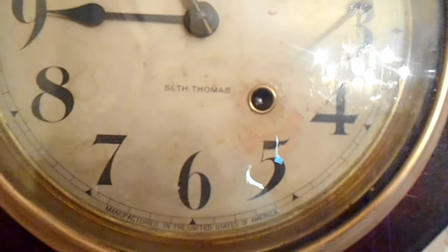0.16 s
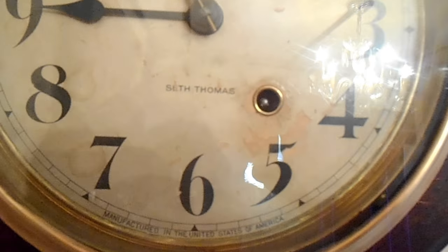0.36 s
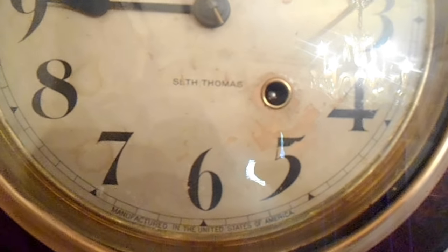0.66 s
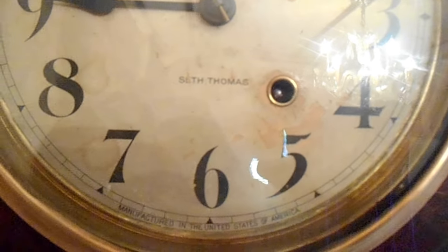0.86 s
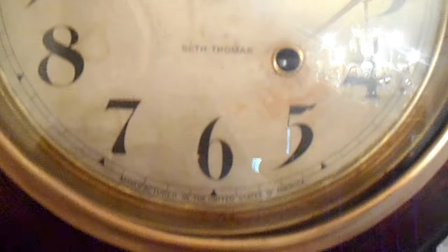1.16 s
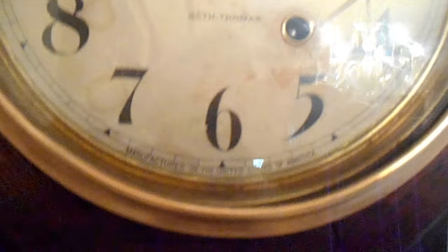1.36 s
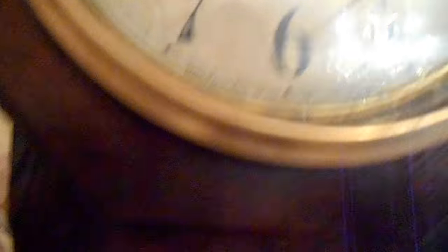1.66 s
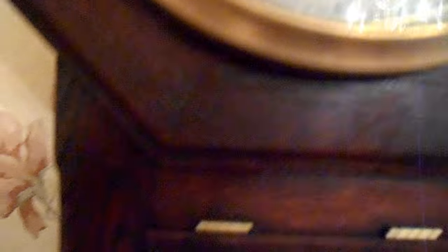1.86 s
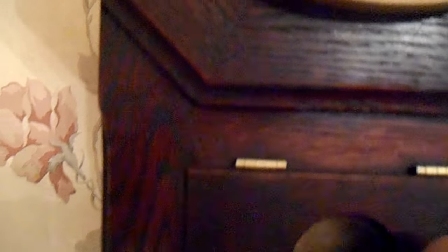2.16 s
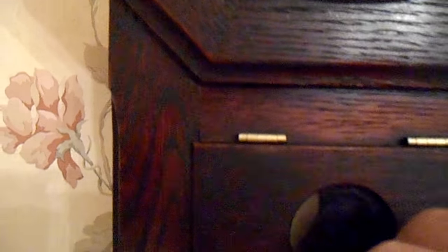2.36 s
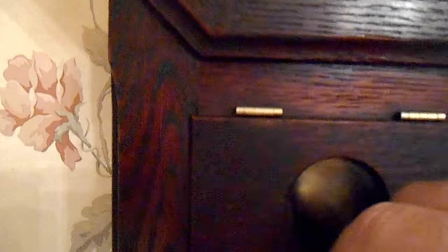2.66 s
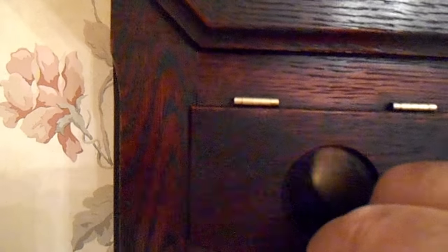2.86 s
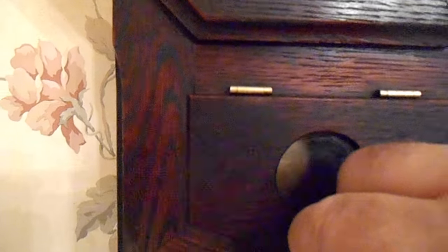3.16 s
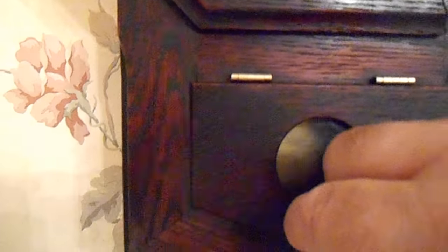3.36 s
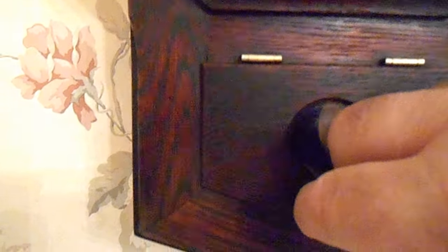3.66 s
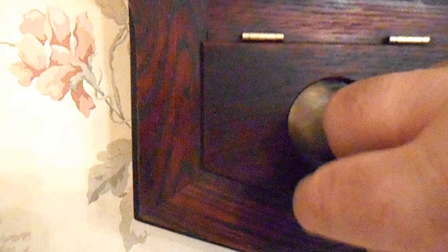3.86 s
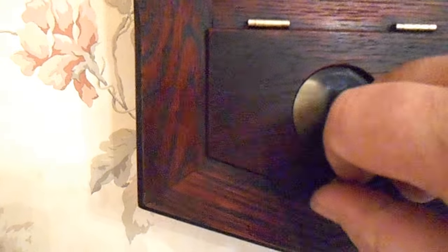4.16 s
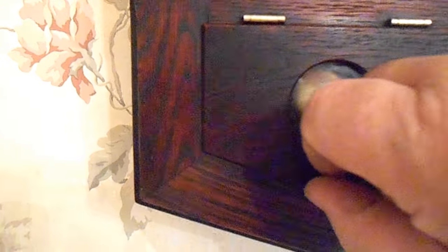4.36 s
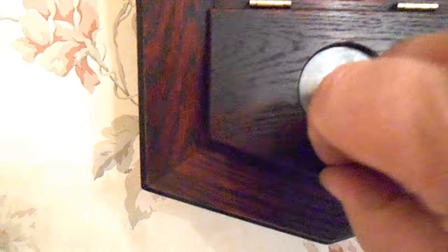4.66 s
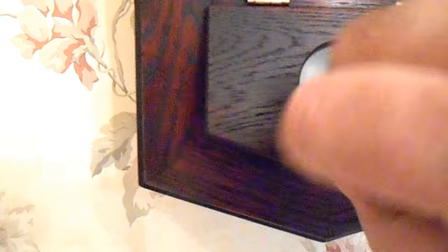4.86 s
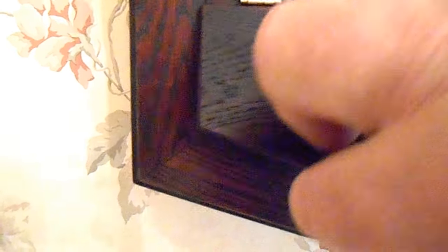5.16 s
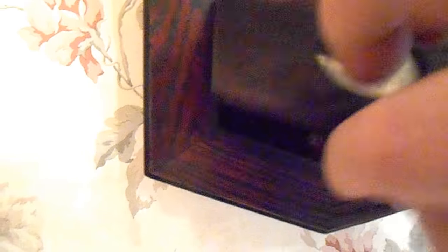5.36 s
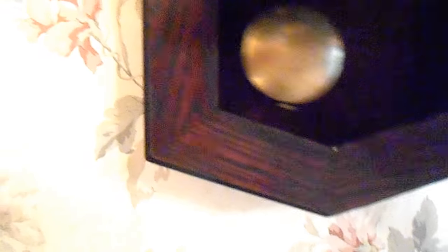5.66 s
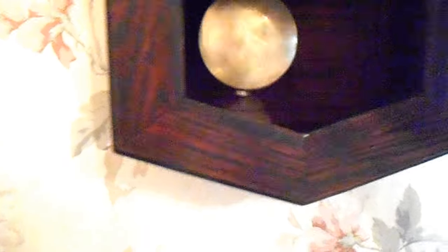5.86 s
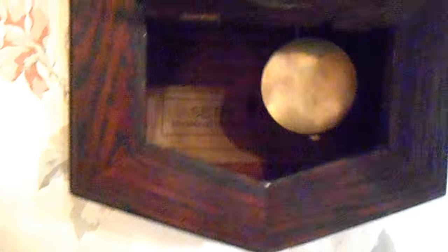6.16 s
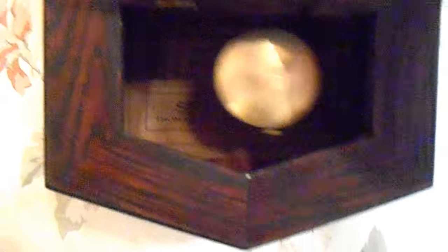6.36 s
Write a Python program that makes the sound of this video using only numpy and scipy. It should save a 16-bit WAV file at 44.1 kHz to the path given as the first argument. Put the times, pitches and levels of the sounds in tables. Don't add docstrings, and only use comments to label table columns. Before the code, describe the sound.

A wooden pendulum clock ticks steadily in a quiet room while a hand rubs, clatters, snaps and knocks, then opens a faintly squeaking little door.

```python
import sys
import numpy as np
from scipy import signal
from scipy.fft import rfft, irfft
from scipy.io import wavfile

SR = 44100
rng = np.random.default_rng(int(sys.argv[2]) if len(sys.argv) > 2 else 0)


def transcribe(u):
    v = np.clip(np.atleast_2d(u).T, -1, 1)
    q = np.round(v * 32767).astype(np.int16)
    wavfile.write(sys.argv[1], SR, q)


def natural_amplitude(level_db):
    exponent = np.asarray(level_db, float) / 20
    return 10 ** exponent


N = 287532

# start in seconds, peak in dB.
TICKS = [(0.118, -27.5), (0.973, -27), (1.828, -26), (2.684, -25.5), (3.537, -28), (4.394, -28),
         (5.247, -26.5), (6.099, -26.5)]
# start in seconds, peak in dB.
TOCKS = [(0.535, -29), (1.391, -26), (2.246, -30.5), (3.099, -27), (3.955, -28.5), (4.809, -27.5),
         (5.666, -30)]
# pitch in Hz, tick level in dB, tock level in dB, T60 in seconds.
CLOCK_MODES = [(579.7, -18, -5, 0.16), (707, -4, -3.5, 0.057), (885, -35, -9, 0.1), (1055, -2, -1.5, 0.055),
               (1187, -43, -12, 0.24), (1460, -9, -8, 0.12), (1520, 0, 2, 0.021), (1675, 1.5, -43, 0.023),
               (1950, -29, -19, 0.0081), (2000, -18.5, -34, 0.023), (2156, -1.5, -30, 0.024),
               (2389, -6.5, 3, 0.03), (2530, 5.5, -17, 0.02), (2637, -11, 2.5, 0.022),
               (2947, -15, 4.5, 0.015), (3210, -23.5, -20.5, 0.082), (3430, -13, -1.5, 0.011)]
# start in seconds, middle peak in dB, bass in dB, treble in dB,
# hardness in dB per octave.
KNOCKS = [(0.388, -41, -39.5, -60, -13), (2.036, -19, -22.5, -19, -5.5), (2.080, -11, -36, -17.5, 7),
          (2.17, -58, -47.5, -68, 1), (2.329, -35.5, -43.5, -38, -8), (2.72, -58, -61, -70, -8),
          (2.764, -37, -52, -54, 8), (3.48, -39.5, -54.5, -50, 6.5), (3.742, -47, -42.5, -69, -6.5),
          (3.9, -52, -58, -70, -1.5), (3.943, -34.5, -40.5, -33, 6.5), (4.167, -23, -27.5, -21.5, -2.5),
          (5.476, -29.5, -46, -39, 12), (5.842, -22.5, -45, -23.5, 3.5), (5.945, -32.5, -37, -49, -4.5)]
# pitch in Hz, level in dB, T60 in seconds.
PANEL_MODES = [(153.3, -22, 0.032), (212.4, -0.5, 0.074), (297, -4.5, 0.068), (377, -4.5, 0.14),
               (480, 6, 0.028), (564, -0.5, 0.104), (668, -2.5, 0.12)]
# pitch in Hz, level in dB, T60 in seconds.
FRAME_MODES = [(737, 3, 0.23), (922, 6, 0.19), (1048, 0, 0.54), (1110, -13, 0.045), (1450, -10, 0.053),
               (1610, -22, 0.15), (1833, 6, 0.098), (1980, 10, 0.038), (2370, -9, 0.037),
               (2450, -14, 0.075), (2733, 9, 0.11), (2960, -13, 0.091), (3360, -1, 0.11)]
# start in seconds, peak in dB, ring pitch in Hz,
# ring level over the crack in dB.
SNAPS = [(1.4258, -34.5, 5570, 7), (1.4915, -30, 10000, -8), (1.6512, -31.5, 4660, -0.5),
         (1.6625, -36, 8150, 0), (1.8523, -21, 4760, -2.5), (1.8926, -35, 3430, -5), (2.076, -28, 3940, 10),
         (2.125, -26.5, 8430, -10), (2.183, -40.5, 8700, -4), (2.588, -12, 6200, 4), (2.5892, -17, 3860, 7),
         (2.89, -46, 4130, 1), (3.11, -47, 3350, -16), (3.444, -43, 3570, -6), (3.7045, -47, 3650, -6),
         (3.9394, -38, 3400, 15), (4.1682, -14, 7700, 2), (4.2723, -44.5, 4400, 5), (5.4133, -43, 3670, -2),
         (5.4743, -20, 3460, -17)]
# start in seconds, middle peak in dB, treble in dB.
CLATTER = [
    (0.019, -16.5, -24.5),
    (0.146, -19.5, -31),
    (0.267, -26.5, -33),
    (0.289, -25.5, -22.5),
    (0.321, -21, -22.5),
    (0.373, -22, -26),
    (0.58, -18.5, -18),
    (0.647, -40, -31),
    (0.693, -28, -22),
]
# pitch in Hz, level in dB, T60 in seconds.
JINGLE = [
    (10487, 4, .6),
    (11620, 9, .55),
    (7500, 2.5, .2),
]
# start in seconds, level in dB.
JINGLE_HITS = [
    (0.584, -48.5),
    (0.693, -60),
]
# time in seconds, level in dB.
RUB = [
    (0.0, -45),
    (0.114, -50),
    (0.25, -48),
    (0.386, -44),
    (0.568, -46.5),
    (0.644, -35.5),
    (0.78, -46),
    (0.92, -71),
]
# frequency in Hz, level in dB per Hz.
RUB_MIDDLE = [(180, -53), (300, -16.5), (585, -10.5), (851, -8.5), (1120, -9), (1920, -7), (4500, -8.5),
              (5850, -62), (9900, -120)]
# frequency in Hz, level in dB per Hz.
RUB_TREBLE = [(3000, -47), (4000, -17), (5500, -18), (6500, -8.5), (7500, -2), (8400, -2), (9500, -12.5),
              (12500, -21), (14000, -40)]
# start in seconds, length in seconds, lowest frequency in Hz,
# first level in dB, last level in dB.
STROKES = [(1.323, 0.15, 4300, -53.5, -55.5), (1.433, 0.057, 4550, -42.5, -38.5),
           (1.53, 0.0098, 7000, -59, -55), (1.656, .057, 6500, -59, -65), (1.867, 0.073, 4840, -55, -59),
           (2.116, 0.13, 3950, -53, -55), (2.32, 0.025, 2900, -43, -57), (2.584, 0.18, 4500, -59, -61),
           (2.758, 0.018, 1500, -49, -53), (2.804, 0.055, 500, -57, -59), (2.884, 0.041, 2000, -44.5, -64),
           (3.473, 0.02, 2000, -50.5, -57), (3.884, 0.058, 497, -62, -45.5), (3.999, 0.053, 1000, -57, -64),
           (5.309, 0.053, 5930, -56, -53), (5.367, .04, 5560, -61, -54), (5.468, 0.14, 2700, -43, -60),
           (5.596, 0.07, 3900, -52.5, -49.5), (5.665, 0.14, 3430, -58, -51), (5.803, 0.058, 4760, -46, -36),
           (5.851, 0.042, 6800, -46, -40.5), (5.895, 0.054, 3430, -54, -43.5)]
# start in seconds, length in seconds, pitch in Hz, width in Hz, level in dB.
SQUEAKS = [
    (2.85, .25, 6550, 50, -67.5),
    (2.93, .13, 1260, 50, -62.5),
    (5.843, .127, 5650, 45, -50),
    (5.84, .018, 5650, 150, -37),
    (5.835, .085, 720, 70, -49),
    (5.91, .045, 4150, 120, -58),
    (5.86, .07, 1450, 60, -55.5),
    (5.5, .11, 5800, 250, -57),
    (1.44, .025, 3750, 200, -43.5),
]
# start in seconds, length in seconds, level in dB.
GROANS = [
    (2.718, 0.19, -66.5),
    (3.905, 0.14, -61.5),
    (4.621, 0.13, -63),
    (4.795, 0.33, -70.5),
    (5.279, .1, -66.5),
    (5.467, .25, -58.5),
    (6.065, .09, -63),
]
# peak time in seconds, level in dB, settling in dB per second.
SWAY = [
    (0.352, -24, 132),
    (0.623, -28, 65),
]
MOTOR_DB = [-70, -63.5, -73.5]
# frequency in Hz, level in dB per Hz.
HISS_COLOUR = [(25, -9), (65, -11), (90, -16), (207, -16.5), (400, -16), (576, -15.5), (1190, -15),
               (2600, -17.5), (3600, -19.5), (5000, -24.5), (8300, -23.5), (10400, -29), (11000, -37.5),
               (13000, -25.5)]

TICK_BRASS_DB, TOCK_BRASS_DB, OPEN_BRASS_DB, DOOR_OPEN_S = -12, -20.5, 8.5, 5.5
RING_STRETCH, HARD_SHORTENS = 1.03, 0.047
SNAP_T60_S, CLATTER_T60_S = 0.0057, 0.31
SLIDE_DB, SLIDE_END_S, SLIDE_FADE_DB_PER_S = -34.5, 0.33, 69
STROKE_TOP_HZ = 9800
GROAN_HZ, GROAN_WIDTH_HZ = 217, 24
SWAY_RISE_DB_PER_S, SWAY_REST_DB = 330, -67
MOTOR_HZ, IN_STEP_S = [57.05, 59.06, 58.66], 3.03
HISS_DB = -55.5
ROOM_T60_S, ROOM_DB = 0.28, -14
MIC_EDGE_HZ, MIC_TOP_DB, CUTOFF_HZ = 10600, -17, 12300


def rms_one(x):
    return x / np.sqrt(np.mean(x ** 2) + 1e-20)


def peak_one(x):
    return x / np.max(np.abs(x))


def gain_curve(rows, column):
    rows = np.array(rows)
    return natural_amplitude(np.interp(np.arange(N) / SR, rows[:, 0], rows[:, column], left=-150, right=-150))


def band(x, low_hz, high_hz, order=2):
    sos = signal.butter(order, [low_hz, min(high_hz, .45 * SR)], "band", fs=SR, output="sos")
    return signal.sosfilt(sos, x)


def coloured(x, spectrum):
    hz, level_db = np.transpose(spectrum)
    grid = np.fft.rfftfreq(len(x), 1 / SR) + 1
    gain = natural_amplitude(np.interp(np.log(grid), np.log(hz), level_db))
    return rms_one(irfft(rfft(x) * gain, len(x)))


def drift(rate_hz):
    return rms_one(band(rng.standard_normal(N), rate_hz / 10, rate_hz, order=1))


def add(out, s, sound):
    at = round(s * SR)
    out[at:at + len(sound)] += sound[:N - at]


def burst(t60, low_hz, high_hz):
    t = np.arange(round(.4 * SR)) / SR
    noise = rng.standard_normal(len(t)) * natural_amplitude(-60 * t / t60)
    return peak_one(band(noise, low_hz, high_hz))


def struck(modes, contact_s, stretch=1, spread_db=2.5, rise_s=0.00029):
    t = np.arange(round(.25 * SR)) / SR
    hz, level_db, t60 = np.transpose(np.repeat(modes, 2, axis=0))[:, :, None]
    chance = rng.standard_normal((len(hz), 3))
    hz = hz * (1 + .02 * chance[:, 2:])
    build_up = 1 - np.exp(-t * (hz / 1000) ** 2 / rise_s)
    longest = np.minimum(.11, .12 * np.sqrt(1000 / hz))
    t60 = np.minimum(t60 * stretch, longest)
    level = natural_amplitude(level_db + spread_db * chance[:, :1] - 60 * t / t60)
    rings = level * build_up * np.sin(2 * np.pi * hz * t)
    contact = rng.standard_normal(1200) * np.exp(-np.arange(1200) / (contact_s * SR))
    contact[round(contact_s * SR / 3)] += 2.4 * np.sqrt(contact_s * SR)
    ringing = np.sum(rings * np.sign(chance[:, 1:2]), axis=0)
    sound = signal.fftconvolve(ringing, contact)[:len(t)]
    sound = np.pad(sound, (0, round(.4 * SR) - len(t)))
    return peak_one(band(sound + 1e-18, hz.min() / 1.5, hz.max() * 1.5))


def escapement():
    out, modes = np.zeros(N), np.array(CLOCK_MODES)
    for beats, column, brass_db in ((TICKS, 1, TICK_BRASS_DB), (TOCKS, 2, TOCK_BRASS_DB)):
        for s, peak_db in beats:
            case = struck(modes[:, [0, column, 3]], .003, rise_s=.009)
            crack = natural_amplitude(-7.5) * burst(0.11, 695, 2640) + natural_amplitude(-6) * burst(0.021, 2000, 3100)
            brass = natural_amplitude(brass_db + OPEN_BRASS_DB * (s > DOOR_OPEN_S)) * burst(0.041, 5000, 8100)
            add(out, s, natural_amplitude(peak_db + 1) * (case + crack + brass))
    return out


def knocks():
    out = np.zeros(N)
    for s, peak_db, bass_db, treble_db, hardness_db in KNOCKS:
        stretch = RING_STRETCH * 2 ** (-HARD_SHORTENS * hardness_db)
        frame = np.array(FRAME_MODES)
        frame[:, 1] += .4 * hardness_db * np.log2(frame[:, 0] / 1500)
        crack_hz = 1500 * 2 ** (hardness_db / 10)
        add(out, s, natural_amplitude(bass_db) * struck(PANEL_MODES, 0.0028, stretch=1.83 * stretch, rise_s=.00004))
        add(out, s, natural_amplitude(bass_db - 7) * burst(0.054, 134, 315))
        add(out, s, natural_amplitude(peak_db - 10) * burst(0.098, crack_hz / 4.1, crack_hz * 1.06))
        add(out, s, natural_amplitude(peak_db - 3.5) * struck(frame, 0.0015, stretch=0.33 * stretch))
        add(out, s, natural_amplitude(peak_db) * struck([(crack_hz, 0, .012)], .0002, rise_s=.0001))
        add(out, s, natural_amplitude(treble_db) * burst(0.04 * stretch, 1500, 5850))
    return out


def snaps():
    out = np.zeros(N)
    for s, peak_db, hz, ring_db in SNAPS:
        crack = band(burst(SNAP_T60_S, 3400, 9500), 3400, 12500, order=3)
        ring = struck([(hz, 0, 1.3 * SNAP_T60_S)], .0003, rise_s=.0001)
        add(out, s, natural_amplitude(peak_db) * peak_one(peak_one(crack) + natural_amplitude(ring_db) * ring))
    return out


def clatter():
    out = np.zeros(N)
    for s, peak_db, treble_db in CLATTER:
        add(out, s, natural_amplitude(peak_db - 0.5) * burst(CLATTER_T60_S, 1190, 2940))
        add(out, s, natural_amplitude(treble_db - 1.5) * burst(0.97 * CLATTER_T60_S, 3000, 8860))
    t = np.arange(round(.28 * SR)) / SR
    jingle = sum(natural_amplitude(level_db - 60 * t / t60) * np.sin(2 * np.pi * hz * t) for hz, level_db, t60 in JINGLE)
    jingle = jingle * np.cos(np.linspace(0, np.pi / 2, len(t)))
    for s, level_db in JINGLE_HITS:
        add(out, s, natural_amplitude(level_db) * jingle)
    return out


def slips():
    size_db = 0.52 * np.minimum(rng.exponential(1, N), 5) + 1.26 * drift(30)
    return rms_one(rng.standard_normal(N) * natural_amplitude(size_db))


def rubbing():
    since_end = np.maximum(np.arange(N) / SR - SLIDE_END_S, 0)
    slide = natural_amplitude(SLIDE_DB - SLIDE_FADE_DB_PER_S * since_end)
    out = gain_curve(RUB, 1) * coloured(slips(), RUB_MIDDLE) + slide * coloured(slips(), RUB_TREBLE)
    grain, edges = slips(), np.r_[300, 1500, np.arange(2500, 14000, 1300)]
    grain = sum(band(grain, low, high) * natural_amplitude(1.8 * drift(20)) for low, high in zip(edges, edges[1:]))
    for start_s, length_s, low_hz, first_db, last_db in STROKES:
        piece = grain[round(start_s * SR):round((start_s + length_s) * SR)]
        stroke = rms_one(band(piece, low_hz, STROKE_TOP_HZ, order=3))
        swell = natural_amplitude(np.linspace(first_db, last_db, len(stroke)))
        add(out, start_s, stroke * swell * signal.windows.tukey(len(stroke), .15))
    return out


def squeaks():
    out = np.zeros(N)
    groans = [(s, length_s, GROAN_HZ, GROAN_WIDTH_HZ, level_db) for s, length_s, level_db in GROANS]
    for s, length_s, hz, width_hz, level_db in list(SQUEAKS) + groans:
        noise = rng.standard_normal(round(length_s * SR))
        tone = rms_one(band(noise, hz - width_hz, hz + width_hz))
        add(out, s, natural_amplitude(level_db) * tone * signal.windows.tukey(len(tone), .15))
    return out


def hand_sway():
    t = np.arange(N) / SR
    jolts = sum(natural_amplitude(db - np.maximum(SWAY_RISE_DB_PER_S * (s - t), fall * (t - s))) for s, db, fall in SWAY)
    return (jolts + natural_amplitude(SWAY_REST_DB)) * rms_one(band(rng.standard_normal(N), 5.3, 17.7))


def motor_hum():
    t = np.arange(N) / SR - IN_STEP_S
    return sum(natural_amplitude(db) * np.cos(2 * np.pi * hz * t) for hz, db in zip(MOTOR_HZ, MOTOR_DB))


def room(x):
    t = np.arange(round(.5 * SR)) / SR
    tail = band(rng.standard_normal(len(t)), 110, 6100, order=1)
    tail = tail * natural_amplitude(-60 * t / ROOM_T60_S) * (t > .006)
    return signal.fftconvolve(x, tail / np.sqrt(np.sum(tail ** 2)))[:N]


def microphone_hiss():
    hiss = natural_amplitude(HISS_DB) * coloured(rng.standard_normal(N), HISS_COLOUR) * natural_amplitude(0.54 * drift(17.0))
    return signal.sosfilt(signal.butter(2, 20, "high", fs=SR, output="sos"), hiss)


def scene():
    blows = escapement() + knocks() + clatter()
    close = snaps() + rubbing() + squeaks() + hand_sway()
    mix = blows + natural_amplitude(ROOM_DB) * room(blows) + close + motor_hum() + microphone_hiss()
    return mix[None]


def band_limit(x):
    return signal.sosfilt(signal.butter(12, 12500, fs=SR, output="sos"), x)


def record(dry):
    below = signal.sosfilt(signal.ellip(6, .5, 50, MIC_EDGE_HZ, fs=SR, output="sos"), dry)
    above = signal.sosfilt(signal.butter(6, 1.05 * MIC_EDGE_HZ, "high", fs=SR, output="sos"), dry)
    cut = signal.ellip(8, .5, 60, CUTOFF_HZ, fs=SR, output="sos")
    heard = signal.sosfilt(cut, below + natural_amplitude(MIC_TOP_DB) * above)
    return band_limit(heard)


dry = scene()
out = record(dry)
transcribe(out)
```